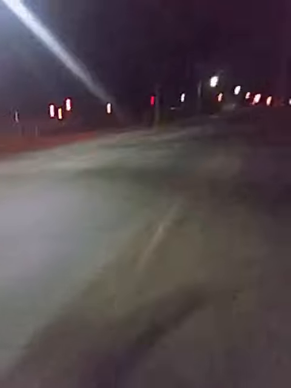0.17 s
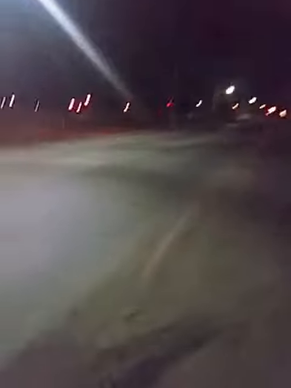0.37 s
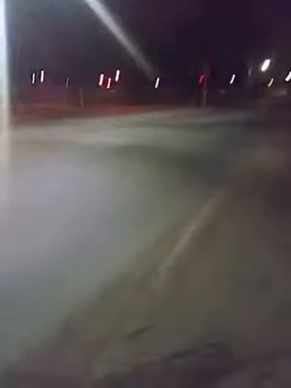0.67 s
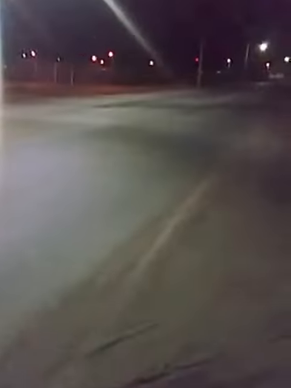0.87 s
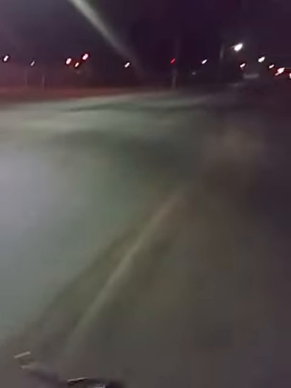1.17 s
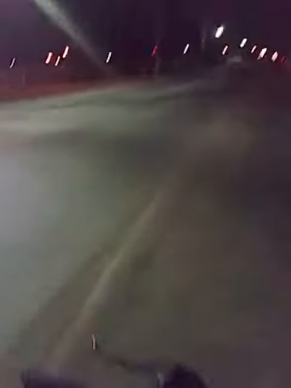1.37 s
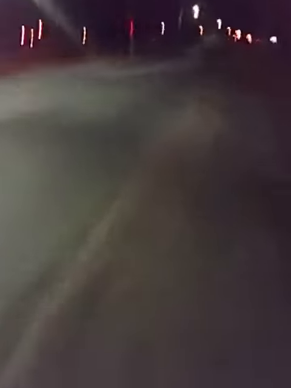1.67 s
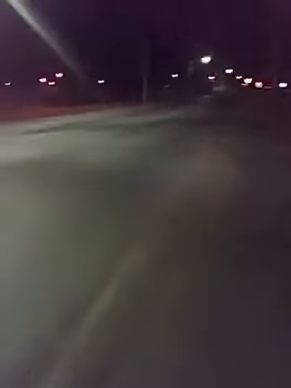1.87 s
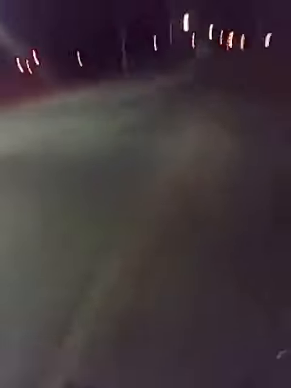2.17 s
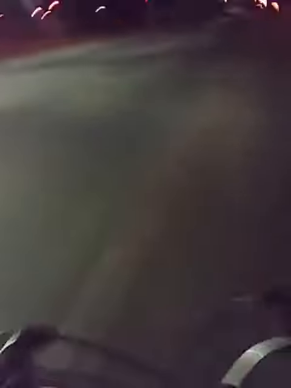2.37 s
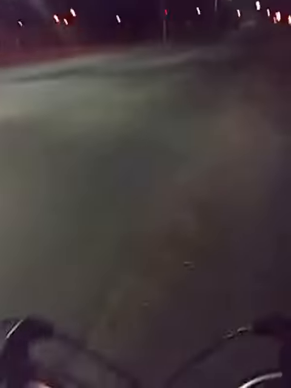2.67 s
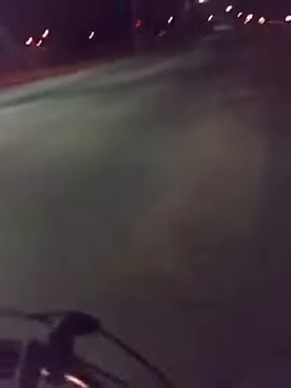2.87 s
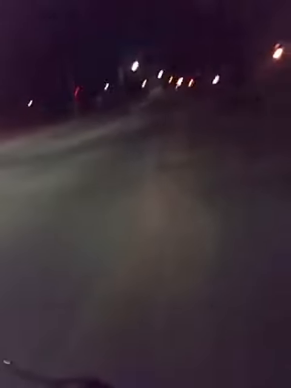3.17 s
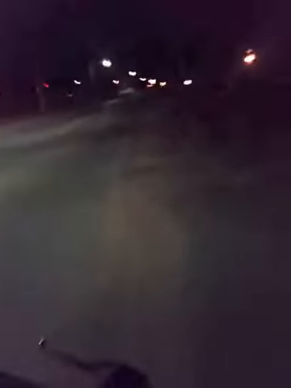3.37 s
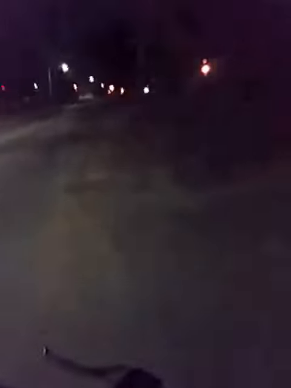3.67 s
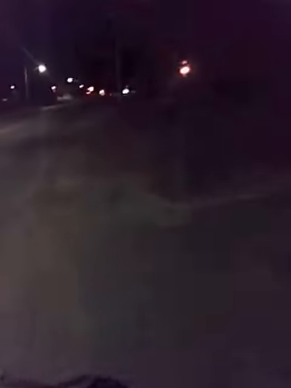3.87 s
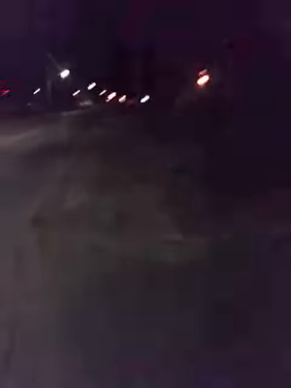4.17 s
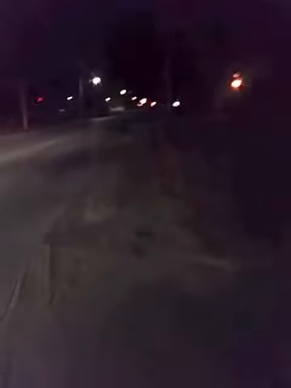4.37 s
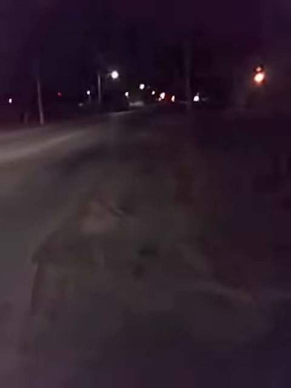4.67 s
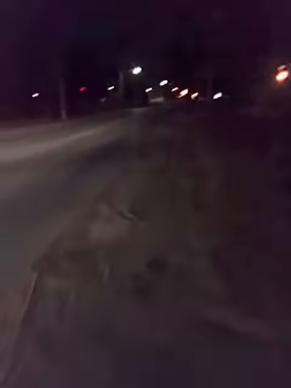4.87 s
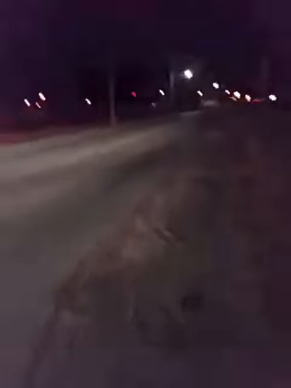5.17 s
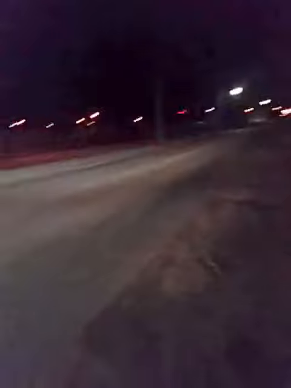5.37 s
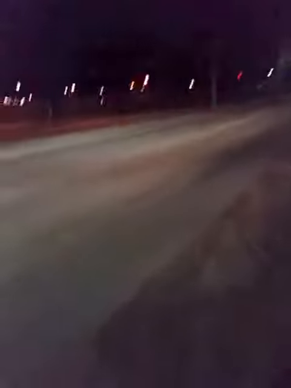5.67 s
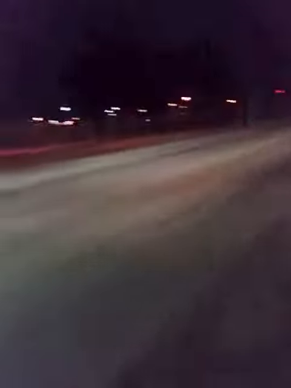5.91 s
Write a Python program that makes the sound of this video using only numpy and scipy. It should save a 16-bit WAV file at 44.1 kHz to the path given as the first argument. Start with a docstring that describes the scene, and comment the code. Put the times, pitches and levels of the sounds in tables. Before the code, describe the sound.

Low, steady engine drone of a small motorbike on the move, under gusting wind rumble and a fine, sizzling rattle of loose parts.

```python
"""A small motorcycle cruises along a street at night, heard at a stereo microphone the rider holds.
Out of silence, wind buffets both ports and the exhaust drones, chiefly on three orders of the crank.
From the first second, loose parts sizzle on the right and rattle; soon a plastic part ticks at times.
The wind eases as the engine gains a little speed, and from 3.5 s to 5 s its second order throbs.
In the last second the roar of the tyres swells."""
import sys
import numpy as np
from scipy import signal
from scipy.fft import rfft, irfft, next_fast_len
from scipy.io import wavfile
from scipy.ndimage import map_coordinates

SR = 44100
rng = np.random.default_rng(int(sys.argv[2]) if len(sys.argv) > 2 else 0)


def dump_mix(stems):
    """Bounce the given channels to the path in sys.argv[1] as a 16-bit WAV at rate SR."""
    frames = np.atleast_2d(stems).T  # one column per channel
    limited = np.clip(frames, -1, 1)  # hard clip at full scale
    pcm = np.round(limited * 32767).astype(np.int16)
    wavfile.write(sys.argv[1], SR, pcm)


N = 266408
TIME_S = np.arange(N) / SR


def amp(db):
    """Amplitude ratio of a level in decibels."""
    return 10 ** (np.asarray(db) / 20)


def unit(x):
    """Normalisation to an rms of 1."""
    return x / np.sqrt(np.mean(x ** 2) + 1e-20)


def along(points, hz):
    """Interpolation on a logarithmic frequency axis."""
    knots_hz, values = np.transpose(points)
    return np.interp(np.log(hz + 1), np.log(knots_hz + 1), values)


def curves(rows):
    """Linear interpolation in time of each column after the first."""
    times, *columns = np.transpose(rows)
    return [np.interp(TIME_S, times, column) for column in columns]


def wobble(knots_per_s):
    """Smooth random modulation: a spline through Gaussian values."""
    return map_coordinates(rng.standard_normal(3000), [np.arange(N) * knots_per_s / SR])


def filtered(x, response):
    """Linear filtering: the spectrum times a frequency response."""
    size = next_fast_len(N + SR // 2)
    return irfft(rfft(x, size) * response(np.fft.rfftfreq(size, 1 / SR)), size)[..., :N]


# Likeness of the two ports: frequency_hz, correlation
COHERENCE = [(60, 1), (740, 0.92), (1220, 0.16), (2000, 0.22), (3300, 0.21), (6000, 0.034)]

def stereo_noise(spectrum, envelope=1):
    """Partial coherence: mid and side noise mix so the ports agree in the bass, hardly in the treble."""
    def colour(hz):
        turn = np.arccos(along(COHERENCE, hz)) / 2
        return amp(along(spectrum, hz)) * [np.cos(turn), np.sin(turn)]
    mid, side = filtered(rng.standard_normal((2, N)), colour)
    return envelope * unit(np.array([mid + side, mid - side]))


# Spectra of frame boom and tyre roar: frequency_hz, density_db
BOOM_SPECTRUM = [(30, -22), (70, -7), (130, 3), (220, -4.5), (330, -7.5), (500, -17.5), (800, -32),
                 (1500, -120)]
TYRE_SPECTRUM = [(250, -69), (450, -2), (700, 0), (880, 1.5), (985, -0.5), (1100, -5), (1700, -7),
                 (2100, -16.5), (3000, -72)]
# Their relative levels: time_s, boom_db, tyre_db
ROAD_LEVELS = [(0.7, -35, -47.5), (1.25, -40.5, -47.5), (2.2, -33, -47.5), (2.4, -36.5, -47.5),
               (3.2, -37, -46), (3.75, -34.5, -41.5), (4.3, -33.5, -40.5), (4.9, -36, -41.5),
               (5.4, -38, -38), (5.7, -38, -33), (6.04, -32, -29)]

def road():
    """Amplitude-modulated noise: the frame booms and the tyres roar, each fluctuating on its own."""
    boom_db, tyre_db = curves(ROAD_LEVELS)
    boom = stereo_noise(BOOM_SPECTRUM, amp(2.0 * wobble(40)))
    tyres = stereo_noise(TYRE_SPECTRUM, amp(1.1 * wobble(20) + 0.94 * wobble(90)))
    return amp(boom_db + 9.0) * unit(boom) + amp(tyre_db + 0.98) * unit(tyres)


# Modes of the plastic part: pitch_hz, level_db, t60_s
PLASTIC_MODES = [(1750, -19, 0.0016), (2240, 5.5, 0.0045), (3020, 4, 0.0053)]
# Its ticks: start_s, relative_level_db, top_mode_gain_db
PLASTIC_TICKS = [(1.2158, -31.5, -5), (1.672, -29, -4), (2.7456, -26, -6), (2.7546, -18, -9),
                 (2.7805, -19, -20), (2.8607, -17, -1.5), (2.9256, -27, -6), (3.2407, -28.5, -5.5),
                 (3.276, -31, -5), (3.7794, -23, -6.5)]

def plastic_ticks():
    """Damped modal vibration: a stiff plastic part rings for only a few cycles."""
    out, t = np.zeros(N + SR), np.arange(SR // 50) / SR
    attack = 1 - np.exp(-(t / 0.00056) ** 2)
    for start_s, db, top_db in PLASTIC_TICKS:
        ring = sum(amp(mode_db + gain_db - 60 * t / t60_s) * np.sin(2 * np.pi * hz * t)
                   for (hz, mode_db, t60_s), gain_db in zip(PLASTIC_MODES, (0, 0, top_db)))
        out[round(start_s * SR):][:len(t)] += amp(db + 12) * attack * ring
    return out[:N] * amp([[1.5], [-1.5]])


def contacts(count, touch_s):
    """Shot noise: an envelope of brief random contacts, many weak and few strong."""
    when, rank = rng.random((count, 2)).T
    impulses = np.bincount((when * N).astype(int), (1.005 - rank) ** -.4, N)
    age = np.arange(SR // 50) / SR / touch_s
    return signal.fftconvolve(impulses, age * np.exp(-age))[:N]


# Bouts of shaking in the loose parts: start_s, length_s, level_db
BOUTS = [(0.434, 0.44, -34.5), (0.88, 0.33, -39.5), (1.322, 0.035, -37), (1.39, .1, -42),
         (1.665, 0.088, -35.5), (1.764, 0.46, -35.5), (2.445, .54, -39.5), (2.986, 0.34, -37),
         (3.327, 0.09, -40), (3.407, 0.19, -36.5), (3.604, 0.084, -42), (3.686, 0.22, -35),
         (3.923, .13, -42), (4.105, 0.095, -36), (4.497, .15, -37), (4.826, 0.11, -37.5), (5.047, .08, -35),
         (5.164, 0.034, -37), (5.3, 0.25, -38.5), (5.676, 0.083, -36.5), (5.758, 0.28, -34)]

def shaking(calm_db=-44, edge_s=0.031):
    """Power addition: the sizzle's level in dB, a calm bed plus bouts that rise, hold and fall."""
    bouts = 0
    for start_s, length_s, db in BOUTS:
        inside_s = np.minimum(TIME_S - start_s, start_s + length_s - TIME_S)
        bouts += amp(db) * np.clip(inside_s / edge_s + .5, 0, 1)
    return 10 * np.log10(amp(calm_db) ** 2 + bouts ** 2)


# The hardest jolts: start_s, relative_level_db
JOLTS = [(0.793, -18), (1.02, -15), (1.1524, -10.5), (1.2689, -18), (1.3227, -25), (1.341, -15),
         (1.6924, -12), (2.1045, -9.5), (2.314, -15), (2.338, -13.5), (2.764, -13), (3.0096, -21),
         (3.0904, -13), (3.15, -13), (3.252, -13), (3.4645, -17), (3.5163, -19), (3.5467, -17),
         (3.894, -26), (4.2611, -17.5), (4.3257, -5.5), (4.5639, -15), (4.638, -14), (4.7167, -13.5),
         (4.946, -14), (5.044, -16), (5.774, -11), (5.864, -13)]

def rattles():
    """Impulsive excitation: an envelope in which each jolt rises and dies within milliseconds."""
    out = np.zeros(N + SR)
    age = np.arange(SR // 16) / SR / 0.0022
    for start_s, db in JOLTS:
        out[round(start_s * SR):][:len(age)] += amp(db - 6.5) * age * np.exp(-age ** 2)
    return out[:N]


# Spectra of the light and the heavier parts: frequency_hz, density_db
SIZZLE_SPECTRUM = [(2650, -87), (4500, -7.5), (5710, -17.5), (8070, -7), (9260, -8), (11200, 2.5),
                   (13400, -5), (15100, -5), (16000, -10)]
CLATTER_SPECTRUM = [(710, -45), (1200, -9.5), (1610, -4), (1980, -4.5), (3100, -2.5), (5610, -11),
                    (6000, -10), (7800, -17), (13200, -120)]
# Slow trend of the clatter: time_s, relative_level_db
CLATTER_TREND = [(.8, -23), (1.6, -24.5), (1.7, -21.5), (2.22, -17), (2.28, -24.5), (2.8, -18), (3.0, -22),
                 (4.3, -24.5), (5.3, -27), (6.04, -22)]

def loose_parts():
    """Contact noise: countless small impacts ride on a hiss that the road swells; hard jolts rattle."""
    sizzle_db, jolts = shaking(), rattles()
    unrest = amp(.8 * wobble(40) + 1.8 * wobble(100))
    fine = contacts(count=1500, touch_s=0.00043)
    sizzle = amp(sizzle_db) * unit(unrest * (1 + 1.55 * fine)) + jolts
    # the heavier parts follow the swells only in part
    clatter_db = curves(CLATTER_TREND)[0] + 0.59 * sizzle_db + 2.16 * wobble(60)
    coarse = contacts(count=500, touch_s=0.0012)
    clatter = amp(clatter_db) * unit(1 + 0.12 * fine + 0.87 * coarse) + amp(-18) * jolts
    return stereo_noise(SIZZLE_SPECTRUM, sizzle) + stereo_noise(CLATTER_SPECTRUM, clatter)


# Spectra of buffeting and flutter: frequency_hz, density_db
BUFFET_SPECTRUM = [(15, -36), (25, -14), (60, 1.5), (125, 3), (260, -11), (550, -32.5), (900, -55),
                   (2000, -120)]
FLUTTER_SPECTRUM = [(120, -60), (250, 5.5), (400, 2.5), (600, -4.5), (900, -29), (1500, -63)]
# Course of the wind, and the peaks of its hard gusts: time_s, relative_level_db
WIND_LEVELS = [(0.58, -30), (0.72, -18.5), (1.03, -17.5), (1.22, -26.5), (1.45, -20), (1.65, -22.5),
               (2.2, -23), (2.4, -22), (2.52, -29), (2.95, -32.5), (3.35, -26.5), (3.9, -32), (4.6, -28.5),
               (4.85, -30.5), (5.4, -31), (5.6, -25.5), (6.0, -43)]
HARD_GUSTS = [(1.4, -34), (1.47, -28.5), (1.75, -34), (2.05, -33), (2.23, -28)]

def wind(flutter_s=0.027, puff_s=0.6392):
    """Turbulent pressure: eddies thump each port independently, and hard gusts flutter brighter."""
    def air(spectrum):
        return unit(filtered(rng.standard_normal((2, N)), lambda hz: amp(along(spectrum, hz))))
    gust_db = curves(WIND_LEVELS)[0] + 0.9 * wobble(9)
    eddies = unit(amp(2.1 * np.array([wobble(25), wobble(25)])))
    thumps = amp(gust_db + 3.0) * eddies * air(BUFFET_SPECTRUM)
    peaks = sum(amp(db) * np.exp(-((TIME_S - s) / flutter_s) ** 2) for s, db in HARD_GUSTS)
    flutter = peaks * air(FLUTTER_SPECTRUM)
    age = (TIME_S - puff_s) / 0.00025
    puff = amp(-10) * np.tanh(3 * age) * np.exp(-np.abs(age) / 4.9)
    # the right port is hit harder; one puff bursts on the left
    return (thumps + flutter) * amp([[-1.2], [1.2]]) + puff * [[1], [0]]


def throb(start_s=3.5, end_s=5.05, edge_s=0.15, dip_s=3.675, beat_hz=3.12, rise_hz_per_s=1.36):
    """Beating: a gain that swells and dips, ever faster, as two phasors turn against each other."""
    depth = 0.65 * np.clip(np.minimum(TIME_S - start_s, end_s - TIME_S) / edge_s, 0, 1)
    since_dip_s = TIME_S - dip_s
    turns = beat_hz * since_dip_s + rise_hz_per_s * since_dip_s ** 2 / 2
    beat = np.abs(1 - depth * np.exp(2j * np.pi * turns)) / (1 + depth)
    return beat ** 1.52  # narrower swells, wider dips


# Crank speed: time_s, rotation_hz
CRANK_SPEED = [(.42, 78.5), (.87, 80), (1.24, 81), (1.88, 81.6), (3.02, 83), (3.33, 86.2), (3.5, 84.3),
               (3.81, 86), (4.73, 87.4), (5.04, 89), (6.04, 89)]
# Orders 1 and 3: time_s, first_db, third_db
FIRST_AND_THIRD = [(0.9, -22.5, -36), (1.31, -33, -36), (1.91, -29, -31), (2.19, -46, -29),
                   (2.27, -22, -30), (2.66, -21, -29), (3.44, -26, -27), (3.68, -19.5, -34),
                   (3.77, -33, -35), (3.92, -18, -29), (4.62, -18, -31), (4.79, -12.5, -27),
                   (4.96, -13, -27), (5.15, -15, -33), (5.3, -12.5, -28), (5.52, -12, -35),
                   (5.68, -11, -28), (5.93, -18, -27)]
# Order 2: time_s, level_db
SECOND_ORDER = [(0.7, -25.5), (1.09, -14), (1.23, -17.5), (1.37, -33), (1.45, -22.5), (1.62, -27.5),
                (1.72, -16.5), (1.87, -22), (2.0, -17.5), (2.33, -17.5), (2.43, -22), (2.68, -17),
                (2.81, -13), (3.14, -17), (3.39, -12.5), (3.425, -40), (3.45, -15), (3.8, -13),
                (3.93, -19.5), (4.6, -14), (5.15, -21), (5.51, -23), (5.66, -35.5), (5.8, -22.5),
                (6.04, -30)]
# Weaker orders, the halves from firing every second turn: order, level_re_boom_db
WEAK_ORDERS = [(.5, -6), (1.5, -4.5), (2.5, -20), (3.5, -13), (4, -6), (5, -13), (6, -22)]

def exhaust(drift_rad=0.6):
    """Engine orders: partials follow the crank speed and drift slowly against each other."""
    crank_rad = 2 * np.pi * np.cumsum(curves(CRANK_SPEED)[0]) / SR
    boom_db = curves(ROAD_LEVELS)[0]
    first_db, third_db = curves(FIRST_AND_THIRD)
    strong = [(1, first_db, .6), (2, curves(SECOND_ORDER)[0], .6), (3, third_db, 2)]
    weak = [(order, boom_db + db, 4) for order, db in WEAK_ORDERS]
    drone = 0
    for order, db, uneven_db in strong + weak:
        # uneven firing shakes timing and size
        jitter_rad = .08 * order * (1 + uneven_db / 5) * wobble(20)
        amplitude = np.sqrt(2) * amp(db + uneven_db * wobble(30))
        if order == 2:
            amplitude *= throb()
        slide_rad = drift_rad * wobble(0.8)
        drone += amplitude * np.cos(order * crank_rad + jitter_rad + slide_rad)
    return drone


def scene():
    """Superposition: all sources add at the two ports."""
    return exhaust() + road() + wind() + loose_parts() + plastic_ticks()


# Colour of the ports: frequency_hz, left_minus_right_db
PORT_BALANCE = [(60, -1), (150, -1), (380, -0.5), (950, 3), (2380, -1.5), (5980, -3), (15000, -9.5)]
# Phase from sound bending round the housing: frequency_hz, left_lag_rad
PORT_LAG = [(900, 0.036), (1400, 1.1), (2070, 3.27), (2700, 5.3), (4000, 8.7)]

def record(dry, silent_s=0.4, fade_s=1, cutoff_hz=15900):
    """Diffraction: the ports differ in phase and colour. The sound then fades in and is band-limited."""
    def ports(hz):
        gain = amp(np.outer([.5, -.5], along(PORT_BALANCE, hz)))
        return gain * np.exp(np.outer([-.5j, .5j], along(PORT_LAG, hz)))
    fade_in = np.clip((TIME_S - silent_s) / fade_s, 0, 1)
    return filtered(filtered(dry, ports) * fade_in, lambda hz: hz < cutoff_hz)


dry = scene()
out = record(dry)
dump_mix(out)
```